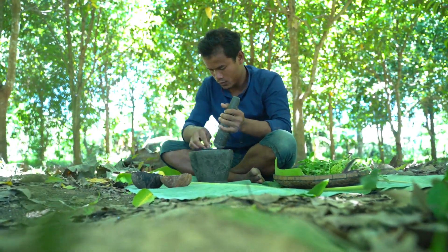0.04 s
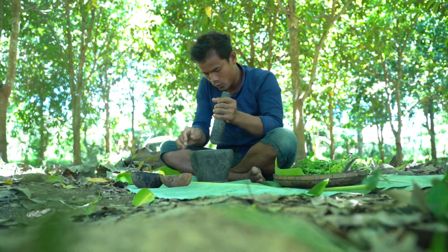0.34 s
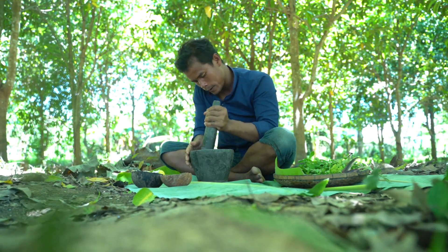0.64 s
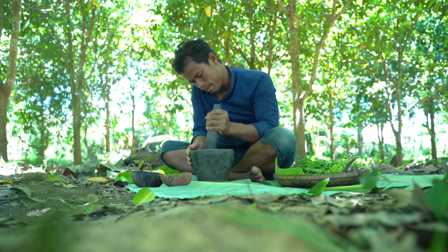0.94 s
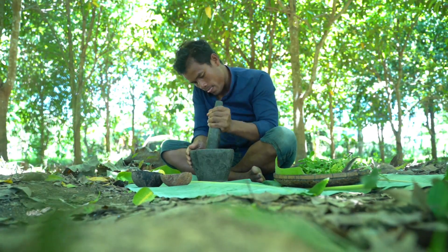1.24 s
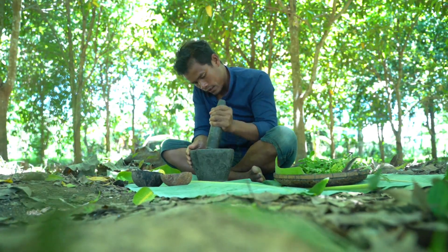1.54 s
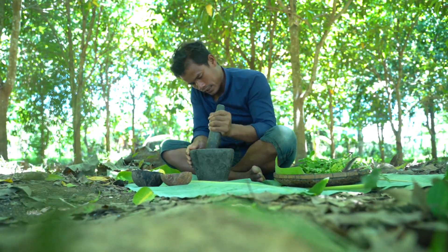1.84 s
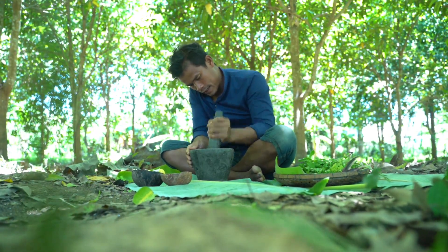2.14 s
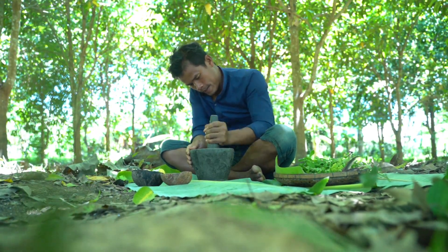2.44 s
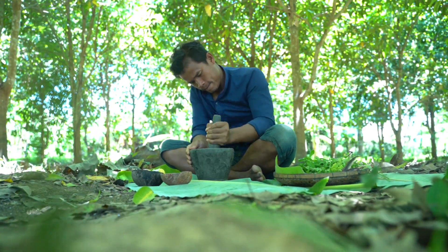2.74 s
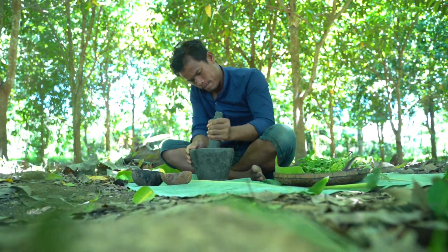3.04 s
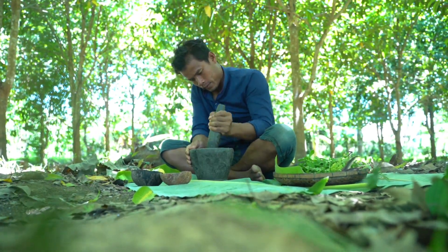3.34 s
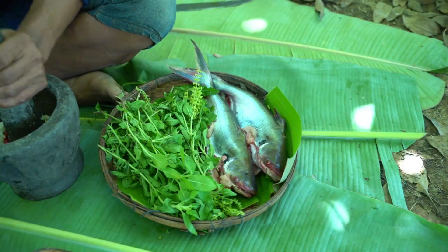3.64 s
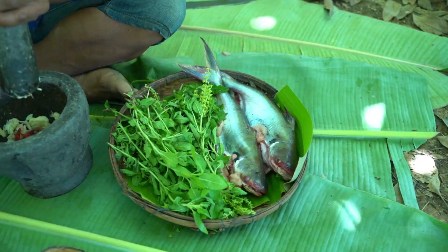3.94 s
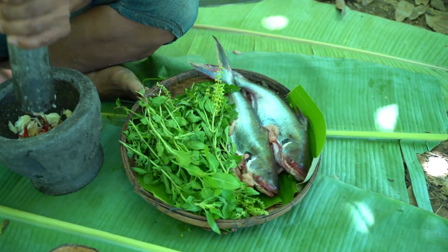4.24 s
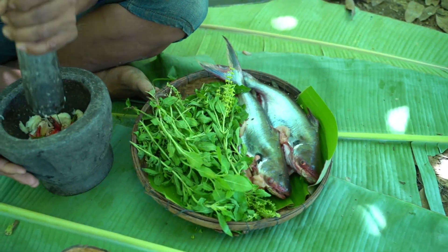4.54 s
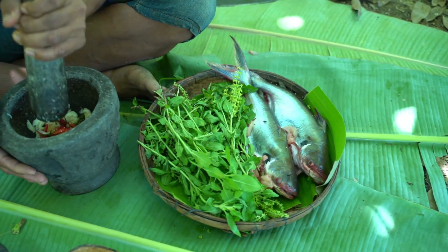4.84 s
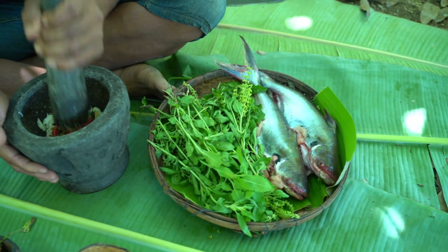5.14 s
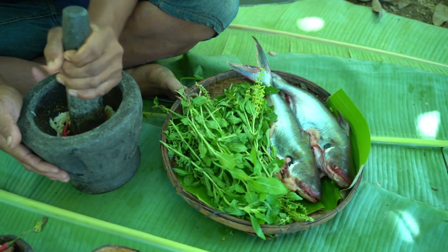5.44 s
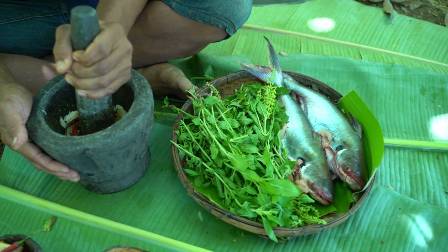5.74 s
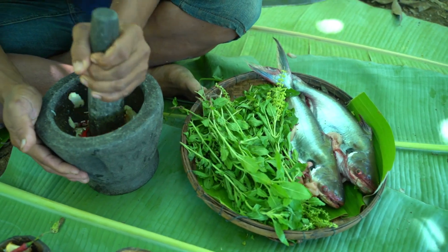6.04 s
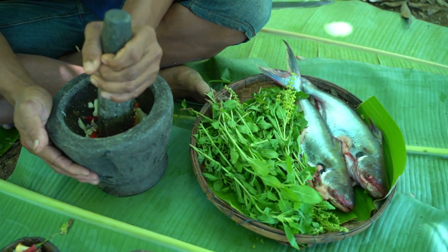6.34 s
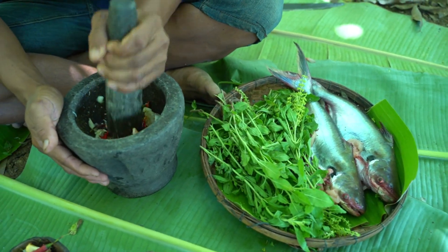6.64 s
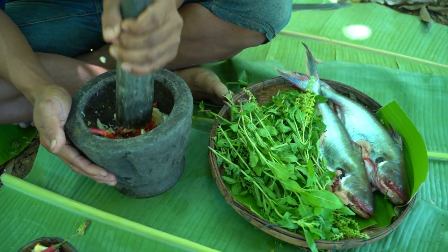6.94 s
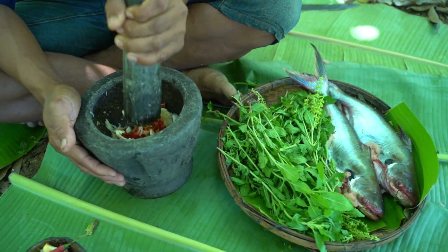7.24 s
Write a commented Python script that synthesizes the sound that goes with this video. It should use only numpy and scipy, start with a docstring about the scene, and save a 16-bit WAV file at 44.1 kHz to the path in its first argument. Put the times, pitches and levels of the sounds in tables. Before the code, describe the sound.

Leaves hiss steadily in a grove over a faint low rumble. For the first half second, herbs rustle and snap as they drop into a stone mortar. From about 0.6 seconds a stone pestle pounds evenly, nearly four strokes a second, heard from a few metres away. Each stroke is a short wet crunch with a quiet knock, a soft thud into the soil and a brief echo from the trees. Louder stone knocks come near 2.8 and 3.3 seconds. At about 3.7 seconds the sound jumps close, slightly left, and the background drops. After a small gap the pounding continues until about 7.1 seconds, juicier, with harder knocks from 5.5 seconds on. A faint, distant rooster and bird whistles come between 3 and 5.3 seconds, with more whistles near 7. A bird gives short high buzzes between 3.2 and 4 seconds and again at 6.2.

```python
"""Herbs rustle and snap as they drop into a stone mortar on the ground of a grove, under hissing leaves.
Then a stone pestle pounds chillies and garlic, heard first from a few metres, later from close by.
Each stroke crushes wet pulp, knocks the bowl quietly and thuds into the soil; some knock louder.
The trees scatter each stroke back, and birds and a rooster call far off."""
import sys
import numpy as np
from scipy import signal
from scipy.fft import rfft, irfft, next_fast_len
from scipy.io import wavfile
from scipy.ndimage import uniform_filter1d, map_coordinates

SR = 44100
rng = np.random.default_rng(int(sys.argv[2]) if len(sys.argv) > 2 else 0)


def dump(signal):
    """Clip the signal to [-1, 1] and save it as 16-bit WAV at the path in sys.argv[1]."""
    limited = np.clip(np.atleast_2d(signal).T, -1, 1)
    pcm = np.round(limited * 32767).astype(np.int16)
    wavfile.write(sys.argv[1], SR, pcm)


N = 321930
TIME = np.arange(N) / SR
HIT_TIME = np.arange(-SR // 20, SR // 5) / SR  # seconds around one hit, which lands at 0

# how loud the background is: t/s, rumble/dB, murmur of the wood/dB, leaf hiss/dB
BACKGROUND_LEVELS = [(0, -51.5, -41.5, -34.5), (.48, -50, -39.5, -34.5), (.66, -56, -44.5, -40),
                     (3.1, -55, -43.5, -37), (3.62, -53.5, -45.5, -41), (3.72, -64, -48.5, -44.5),
                     (5.1, -60.5, -45, -43.5), (7.3, -60, -42, -40)]
# the tone colour of those three sounds: f/Hz, level/dB
RUMBLE_COLOUR = [(15, -56), (25, -38), (97, -1.5), (151, 0.5), (178, 0.5), (270, -2.5), (400, -6.5),
                 (520, 0.5), (880, -120)]
WOOD_COLOUR = [(180, -22), (300, -11), (551, -2), (929, -1.5), (1430, 0.5), (1910, 0), (2800, -6.5),
               (3640, -21), (6160, -120)]
LEAF_COLOUR = [(1290, -21), (2200, -3), (3970, 2.5), (4380, 1.5), (4840, 1), (5350, 0), (9480, -3),
               (13100, -8.5), (16000, -12)]
# how alike left and right are in the background: f/Hz, likeness (1 = the same)
BACKGROUND_LIKENESS = [(40, 0.83), (150, 1), (400, 0.67), (1000, 0.52), (2500, 0.017), (10000, 0.042)]
# bird whistles and rooster notes: t/s, length/s, start f/Hz, end f/Hz, level/dB, overtone/dB
BIRD_NOTES = [(3.149, 0.57, 455, 439, -58.5, -20), (3.567, 0.097, 1136, 1150, -41, -10),
              (4.005, 0.16, 2920, 2690, -49, -30), (4.808, 0.21, 3350, 2750, -52, -30),
              (4.86, 0.27, 1170, 1097, -53.5, 1), (5.166, 0.098, 1390, 1220, -48, -10),
              (7.043, 0.087, 2875, 2500, -45, -24), (7.22, .09, 3850, 3510, -52, -30)]
# a bird's buzzing calls: peak t/s, half length/s, level/dB
BUZZ_CALLS = [(3.198, 0.034, -31.5), (3.697, 0.014, -37), (3.766, 0.029, -37.5), (3.95, 0.038, -37),
              (6.192, 0.052, -27.5)]
# their tone colour: f/Hz, level/dB
BUZZ_COLOUR = [(3300, -64), (4250, -0.5), (4600, 3), (4950, 3), (5300, -12), (6300, -52)]
# what the trees send back: f/Hz, far level/dB, close level/dB
ECHO_COLOUR = [(150, -40, -34), (500, -21, -43), (1160, -16.5, -20), (1850, -13, -24), (2700, -3, -1),
               (4080, -1, 1.5), (7650, 1, 2), (15900, -0.5, -3.5)]
# herbs rustling in the hand: t/s, level/dB
RUSTLE_LEVELS = [(0, -54), (.18, -41), (.3, -29.5), (.42, -39.5), (.53, -48), (.62, -60), (.7, -100)]
# their tone colour: f/Hz, level/dB
RUSTLE_COLOUR = [(100, -16), (300, -14), (1000, -3), (2500, -4), (5000, 4), (10000, 4), (16000, -6)]
# herbs snapping early on; later, ticks (some just before strokes) and a hiss after one stroke:
# t/s, level/dB, f/Hz, width/octaves, fall/s
SHORT_CRACKLES = [(.095, -12.5, 11000, 2.4, 0.0023), (.141, -25, 9000, 1.7, .002),
                  (.1412, -30, 750, 0.3, 0.0031), (.246, -18.5, 6150, .13, 0.0062),
                  (.248, -23, 2920, .3, 0.006), (.308, -21, 5970, 1.4, 0.014),
                  (.319, -20, 7700, 1.9, 0.016), (.523, -21.5, 9300, .22, 0.015),
                  (.523, -29.5, 3020, .18, 0.019), (.534, -27, 2740, 0.81, 0.013),
                  (2.475, -27, 3960, 2.3, 0.019), (3.651, -27.5, 4500, 0.89, .0035),
                  (3.881, -28, 4480, .38, .004), (4.02, -40.5, 1300, 0.89, 0.077),
                  (4.147, -19.5, 3900, 1.5, .006), (4.172, -25.5, 4730, 0.38, 0.052),
                  (4.439, -19, 2600, 1.1, 0.0027), (5.773, -32, 3000, 1.5, .0025),
                  (6.0517, -20, 4000, 1.2, 0.0026), (6.334, -17, 5000, 2.4, .002),
                  (6.935, -30.5, 394, 0.31, 0.0084), (6.935, -28.5, 1380, 1.2, 0.011)]
# how alike left and right are in crackles and crushes: f/Hz, far likeness, close likeness
CRACKLE_LIKENESS = [(700, 1, 0.99), (2980, 0.91, 0.42), (6000, 0.56, 1), (11900, 0.61, 0.059)]
# how much louder the mortar is on the left: f/Hz, far level/dB, close level/dB
LEFT_BOOST = [(200, 0.5, -1), (890, 1.5, 4), (2700, 0.5, 7), (5600, -3.5, 3.5), (12000, -3.5, 1)]
# the soil's low tones: f/Hz, far level/dB, close level/dB, fade/s (time to drop by 60 dB)
SOIL_TONES = [(124, -12, -3, 0.068), (164, 6.5, -7, 0.043), (203, -2.5, -9, 0.065), (404, 4, 3, 0.026)]
# the bowl's hollow and wall: f/Hz, far level/dB, close level/dB, fade/s, share of the hardness (0-1)
BOWL_TONES = [(352, -23, -16, 0.017, 0), (681, 7.5, -24, 0.026, 0.66), (808, -34, 12.5, 0.012, 0.22),
              (903, 5, 1.5, 0.029, 0.35), (975, 8, 3.5, 0.021, 0.72), (1512, 15, 9.5, 0.011, 0.83),
              (1690, -3, 15, 0.0097, 0.77), (3430, -31, -27, 0.1, 0.5), (3740, -43, -32, 0.11, 0.6),
              (4150, -20, -26, 0.085, 0.36)]
# tones the bowl's mouth boosts: f/Hz, sharpness (Q), far boost/dB, close boost/dB
MOUTH_PEAKS = [(1717, 4.2, 3.5, 5), (3620, 10.4, 1, 5.5)]
# tone colour of crushed pulp: f/Hz, far level/dB, close level/dB
PULP_COLOUR = [(100, -35, -12), (540, -18.5, -20), (970, -2.5, -5), (1174, -12, -12), (1510, 1, -6.5),
               (2650, -0.5, -2.5), (3460, -5, -8), (5230, -7.5, -3.5), (6760, -5.5, -5.5), (9700, -6.5, -6),
               (13100, -8, -11.5), (16100, -13.5, -15)]
# pestle strokes: t/s, crush level/dB, rise/s, fall/s, pulp body/dB, air gap f/Hz, thud level/dB
PESTLE_STROKES = [(.575, -9, 0.00042, 0.0083, -3.5, 6060, -46),
                  (.875, -7.5, 0.0018, 0.0064, -5.5, 1740, -42),
                  (1.1531, -6.5, 0.00056, 0.0028, 2, 2600, -38),
                  (1.428, -6.5, 0.0021, 0.0018, 1.5, 3470, -31),
                  (1.7008, -10, 0.0048, 0.0074, -4.5, 1840, -38),
                  (1.981, -8, .0029, .0024, -3.5, 5860, -24.5), (2.2542, -5, 0.0005, 0.0031, -4, 2230, -19),
                  (2.5027, -10, 0.0039, 0.0066, -10.5, 2850, -36),
                  (2.774, -12.5, .0038, 0.008, -8.5, 4930, -28.5),
                  (3.0286, -6.5, 0.0004, 0.0063, -9.5, 3550, -30),
                  (3.286, -10, 0.00043, 0.0026, -6, 2250, -27),
                  (3.5496, -15.5, .0081, 0.0066, -4, 3700, -30.5),
                  (3.7074, -7.5, 0.00046, 0.0019, 0.5, 3500, -33),
                  (4.1563, -7, 0.00075, 0.0018, -5.5, 4300, -46),
                  (4.4454, -6, 0.00047, 0.0021, -1.5, 4100, -27),
                  (4.726, -8, 0.00032, 0.0023, -1.5, 3760, -30),
                  (4.9944, -8.5, 0.00022, 0.0034, -5.5, 3340, -35),
                  (5.2624, -8.5, .00036, 0.0034, -9, 3740, -28.5),
                  (5.5298, -7, 0.0005, 0.0014, -7, 1600, -27),
                  (5.7951, -7, 0.00067, 0.0013, -13, 2660, -23),
                  (6.0645, -10.5, .0046, .0087, -3.5, 4420, -33),
                  (6.3435, -6, .0006, 0.0027, -8, 5170, -23), (6.6057, -9, .0004, 0.0086, -5, 6330, -41),
                  (6.8727, -13.5, 0.00026, 0.0022, -17, 4280, -46),
                  (7.1292, -15.5, 0.00049, 0.0067, -2, 6300, -58)]
# extra knocks where a stroke reaches bare stone: t/s, level/dB, hardness/dB
STONE_KNOCKS = [(1.427, -28, 8), (2.494, -21.5, -5), (2.7694, -8, 10), (3.2859, -5.5, 9),
                (3.5485, -20.5, -9), (3.7087, -16.5, -15), (5.2604, -26, -3), (5.527, -13, -16),
                (5.7955, -6.5, -33), (6.3441, -13, -11), (6.8711, -8.5, -1), (7.1307, -7.5, -11)]

CLOSE_FROM_S = 3.67  # the listener is close by from here on
# Each pair is (far, close); the functions pick one with close = 0 or 1.
LEFT_LEAD_S = (-0.0000021, 0.000035)  # how much sooner the left ear hears the mortar
LEAD_IN_S = (0.0025, 0.0038)  # base length of the faint noise just before each stroke's peak
FIZZ_DB, FIZZ_DB_PER_S = (2, -3), (-1.3, 0.5)  # crisp herbs go limp; later the pulp turns juicy
FIZZ_DB_PER_DOUBLING, USUAL_FALL_S = (0.5, 2), 0.0034  # a longer crush is wetter and fizzes more
QUIET_KNOCK_DB, QUIET_HARDNESS_DB = (-25.5, -30.5), (0.5, 8.5)  # the quiet knock in every stroke
ECHO_DB, ECHO_DB_PER_S = (0, -8.5), (0, -0.33)  # close by, the echo thins as the pounding goes on
DRIFT_ZERO_S = (0.5, 2.8)  # the fizz and echo drifts count from this time


def amp(db):
    """Turn decibels into a number to multiply by."""
    return 10 ** (np.asarray(db) / 20)


def unit(x):
    """Scale a sound to an average (rms) size of 1."""
    return x / np.sqrt(np.mean(x ** 2) + 1e-20)


def along(points, hz, column=0):
    """Read one column of a frequency table, sliding between rows on a pitch scale."""
    f, *values = np.transpose(points)
    return np.interp(np.log(hz + 1), np.log(f), values[column])


def curves(rows):
    """Turn each column of a time table into one value per sample."""
    s, *columns = np.transpose(rows)
    return [np.interp(TIME, s, c) for c in columns]


def wobble(rate, size):
    """A smooth curve through `rate` random points a second."""
    points = rng.standard_normal(int(size * rate / SR) + 4)
    return map_coordinates(points, [np.arange(size) * rate / SR])


def filtered(x, response):
    """Multiply each frequency in x by response(hz)."""
    n = x.shape[-1]
    padded = next_fast_len(n + 4096)
    return irfft(rfft(x, padded) * response(np.fft.rfftfreq(padded, 1 / SR)), padded)[..., :n]


def coloured(x, table, column=0):
    """Give a sound the tone colour in a table."""
    return filtered(x, lambda hz: amp(along(table, hz, column)))


def resonance(hz, centre_hz, q, db):
    """Boost the frequencies near centre_hz; a bigger q makes the peak narrower."""
    return 1 + (amp(db) - 1) / (1 + 1j * q * (hz / centre_hz - centre_hz / (hz + 1)))


def spread(pair, likeness, column=0):
    """Mix two unrelated noises into left and right with the given likeness."""
    turn = lambda hz: np.arccos(np.clip(along(likeness, hz, column), -1, 1)) / 2
    mid, side = filtered(pair, lambda hz: np.array([np.cos(turn(hz)), np.sin(turn(hz))]))
    return np.array([mid + side, mid - side])


def add(track, s, sound):
    """Mix a sound into the track, starting at s seconds."""
    start = round(s * SR)
    part = sound[..., :N - start]
    track[:, start:start + part.shape[-1]] += part


def crackle(size, clump_db):
    """Two streams of tiny noise bursts, some louder, some softer."""
    return unit(rng.standard_normal((2, size)) * amp(clump_db * wobble(3000, size)))


def rush(colour, patchy_db):
    """Outdoor noise with louder and softer patches across pitch and time."""
    grid = signal.stft(rng.standard_normal((2, N)), nperseg=512)[2]
    patches = uniform_filter1d(rng.standard_normal(grid.shape[1:]), size=4, axis=0)
    patches = uniform_filter1d(patches, size=14, axis=1)
    pair = signal.istft(grid * amp(patchy_db * unit(patches)), nperseg=512)[1][:, :N]
    return unit(coloured(spread(pair, BACKGROUND_LIKENESS), colour))


def background(drift_db=0.93, flutter_db=1.36, dip_db=-19, dip_s=0.0092):
    """Low rumble, the far wood and hissing leaves; all dip briefly at 3.67 s."""
    rumble_db, wood_db, leaf_db = curves(BACKGROUND_LEVELS)
    rumble = amp(rumble_db + drift_db * wobble(5, N)) * rush(RUMBLE_COLOUR, patchy_db=-1.0)
    wood = amp(wood_db + drift_db * wobble(2.67, N)) * rush(WOOD_COLOUR, patchy_db=2.5)
    leaves = amp(leaf_db + flutter_db * wobble(3.77, N)) * rush(LEAF_COLOUR, patchy_db=2.5)
    dip = amp(dip_db * np.exp(-((TIME - CLOSE_FROM_S - dip_s) / dip_s) ** 2))
    return dip * (rumble + wood + leaves)


def bird_notes(blur_s=0.23, clear_share=0.81):
    """Gliding whistles and rooster notes, blurred by their many paths through the trees."""
    track = np.zeros((2, N))
    for s, length, start_hz, end_hz, db, overtone_db in BIRD_NOTES:
        progress = np.linspace(0, 1, round(length * SR))
        glide_hz = end_hz + (start_hz - end_hz) * (1 - progress) ** 2
        hz = glide_hz * (1 + 0.0093 * wobble(125, len(progress)))
        phase = 2 * np.pi * np.cumsum(hz) / SR
        swell = np.sqrt(2 * np.abs(np.sin(np.pi * progress))) * amp(db + 3.8 * wobble(53, len(progress)))
        add(track, s, swell * (np.sin(phase) + amp(overtone_db) * np.sin(2 * phase)))
    paths = rng.standard_normal((2, SR // 4)) * amp(-60 * np.arange(SR // 4) / SR / blur_s)
    blurred = signal.fftconvolve(track, paths / np.linalg.norm(paths[0]), axes=1)[:, :N]
    return np.sqrt(clear_share) * track + np.sqrt(1 - clear_share) * blurred


def bird_buzz():
    """A bird buzzes: short, fluttering swells of high, narrow noise."""
    buzz = unit(coloured(rng.standard_normal((2, N)), BUZZ_COLOUR))
    calls = sum(amp(db) / np.cosh(np.minimum(1.53 * np.abs(TIME - s) / half_length, 20))
                for s, half_length, db in BUZZ_CALLS)
    return buzz * calls * amp(1.9 * wobble(107, N))


def tree_echo(sound, close):
    """Trunks and leaves scatter a sound into noise of a like colour, swelling after a short gap."""
    t = np.arange(SR // 2) / SR
    swell = np.clip((t - 0.0064) / 0.0054, 0, 1)
    fade = amp(-60 * t / (0.52 if close else 0.25)) + amp(-28.5 - 60 * t / 0.75)
    answer = (swell * fade) ** 2
    power = np.abs(signal.fftconvolve(np.mean(sound ** 2, axis=0), answer / answer.sum()))
    bins, density = signal.welch(sound, SR, nperseg=96, detrend=False)
    colour = lambda hz: np.sqrt(np.interp(hz, bins, density.mean(axis=0)))
    scatter = unit(filtered(rng.standard_normal((2, len(power))), colour))
    return coloured(scatter * np.sqrt(power), ECHO_COLOUR, close)


def herb_rustle():
    """Leaves rustle in the hand."""
    return amp(curves(RUSTLE_LEVELS)[0]) * unit(coloured(crackle(N, clump_db=5.5), RUSTLE_COLOUR))


def short_crackles(rise_s=0.0005, echo_db=-13.5):
    """Herbs snap early on; later come ticks and a hiss around the strokes. Each has an echo."""
    track = np.zeros((2, N))
    for s, db, pitch_hz, width, fall in SHORT_CRACKLES:
        close = int(s > CLOSE_FROM_S)
        band = lambda hz: 1 / (1 + (np.log2((hz + 1) / pitch_hz) / width) ** 2)
        envelope = np.exp(-np.abs(HIT_TIME) / np.where(HIT_TIME < 0, rise_s, fall))
        bursts = spread(crackle(len(HIT_TIME), clump_db=-0.5), CRACKLE_LIKENESS)
        sound = amp(db) * envelope * unit(filtered(bursts, band))
        add(track, s + HIT_TIME[0], sound)
        add(track, s + HIT_TIME[0], amp(echo_db) * tree_echo(sound, close))
    return track


def placed(pair, close):
    """Place the mortar between the ears; from close by it is louder and earlier on the left."""
    sides = np.array([[0.5], [-0.5]])
    balance = lambda hz: amp(along(LEFT_BOOST, hz, close) * sides)
    time_shift = lambda hz: np.exp(2j * np.pi * hz * LEFT_LEAD_S[close] * sides)
    return filtered(pair, lambda hz: balance(hz) * time_shift(hz))


def small_bowl(x, corner_hz=110):
    """A small bowl gives off little deep bass."""
    return filtered(x, lambda hz: (1j * hz / (corner_hz + 1j * hz)) ** 2)


def thud(close, attack_s=0.005):
    """The mortar's weight is driven into the soil just after the blow."""
    t = np.maximum(HIT_TIME - (0.001 if close else 0.003), 0)
    soil = 0
    for hz, far_db, close_db, fade_s in SOIL_TONES:
        db = close_db if close else far_db
        pitch_hz = hz * (1 + 0.074 * rng.standard_normal())
        soil = soil + amp(db - 60 * t / fade_s) * np.sin(2 * np.pi * pitch_hz * t)
    return soil * (1 - np.exp(-t / attack_s))


def knock(delay_s, hardness_db, close, attack_s=0.0021):
    """Stone meets stone: the bowl rings briefly, and the hardness sets how bright it sounds."""
    t = np.maximum(HIT_TIME - delay_s, 0)
    ring = 0
    for hz, far_db, close_db, fade_s, share in BOWL_TONES:
        db = (close_db if close else far_db) + share * hardness_db + rng.normal(0, 1)
        pitch_hz = hz * (1 + 0.02 * rng.standard_normal())
        ring = ring + amp(db - 60 * t / fade_s) * np.sin(2 * np.pi * pitch_hz * t)
    ring = ring * (1 - np.exp(-t / attack_s))
    strength = np.sqrt(np.sum(ring ** 2) / (0.002 * SR))
    return placed(np.array([ring, ring]) / strength, close)


def crush(rise, fall, body_db, fizz_db, gap_hz, close, ripple_db=1.5):
    """Plant cells burst under the pestle: after a faint lead-in, a peak and a quick dying away."""
    t = HIT_TIME
    landing = np.exp(-np.abs(t) / np.where(t < 0, rise, fall))
    lead_s = LEAD_IN_S[close] + 1.7 * rise  # longer before a soft landing
    lead_in = 0.21 * (t < 0) / (1 + np.abs(t / lead_s) ** 6)
    envelope = np.hypot(landing, lead_in)
    ripple = np.transpose([np.geomspace(600, 16000, num=44), ripple_db * rng.standard_normal(44)])
    stroke = [(700, body_db / 2), (1800, body_db), (3200, 0), (5500, 0), (9000, fizz_db)]
    pulp = lambda hz: amp(along(PULP_COLOUR, hz, close) + along(stroke, hz) + along(ripple, hz))
    # the air gap between pestle and bowl rings at a new pitch with every stroke
    gap = lambda hz: resonance(hz, gap_hz, q=9, db=6)
    mouth = lambda hz: np.prod([resonance(hz, f, q, db[close]) for f, q, *db in MOUTH_PEAKS], axis=0)
    bursts = spread(crackle(len(t), clump_db=3.0), CRACKLE_LIKENESS, close)
    crunch = filtered(bursts * envelope, lambda hz: pulp(hz) * gap(hz) * mouth(hz))
    return unit(placed(crunch, close)) * np.sqrt(np.mean(envelope ** 2))


def pounding(knock_lead_s=0.004005):
    """Each stroke crushes, knocks quietly and thuds; some knock louder; the trees answer."""
    track = np.zeros((2, N))
    for s, db, rise, fall, body_db, gap_hz, thud_db in PESTLE_STROKES:
        close = int(s > CLOSE_FROM_S)
        elapsed = s - DRIFT_ZERO_S[close]
        wetness_db = FIZZ_DB_PER_DOUBLING[close] * np.log2(fall / USUAL_FALL_S)
        fizz_db = FIZZ_DB[close] + FIZZ_DB_PER_S[close] * elapsed + wetness_db
        pulp = amp(db) * crush(rise, fall, body_db, fizz_db, gap_hz, close)
        quiet_knock = amp(QUIET_KNOCK_DB[close]) * knock(-knock_lead_s, QUIET_HARDNESS_DB[close], close)
        add(track, s + HIT_TIME[0], pulp + quiet_knock + amp(thud_db) * thud(close))
        echo_db = ECHO_DB[close] + ECHO_DB_PER_S[close] * elapsed
        add(track, s + HIT_TIME[0], amp(echo_db) * tree_echo(pulp + quiet_knock, close))
    for s, db, hardness_db in STONE_KNOCKS:
        close = int(s > CLOSE_FROM_S)
        stone = amp(db) * knock(0, hardness_db, close)
        add(track, s + HIT_TIME[0], stone)
        add(track, s + HIT_TIME[0], amp(ECHO_DB[close]) * tree_echo(stone, close))
    return track


def scene():
    """Everything heard in the grove."""
    mortar = small_bowl(pounding()) + herb_rustle() + short_crackles()
    return mortar + bird_notes() + bird_buzz() + background()


def gain_control(x, treble_hz=2500, above_db=-22.5, share=0.5, attack_s=0.047, recover_db_per_s=24):
    """From close by, each sharp crack turns the volume down; then it creeps back up."""
    treble = filtered(x, lambda hz: hz / np.hypot(hz, treble_hz))
    power = uniform_filter1d(np.mean(treble ** 2, axis=0), size=128)
    level_db = 10 * np.log10(np.abs(power) + 1e-12)
    wanted_db = share * np.maximum(level_db - above_db, 0) * (TIME > CLOSE_FROM_S)
    recovery_db = recover_db_per_s * TIME
    down_db = np.maximum.accumulate(wanted_db + recovery_db) - recovery_db
    smoothing = np.exp(-1 / (attack_s * SR))
    return x * amp(-signal.lfilter([1 - smoothing], [1, -smoothing], down_db))


def record(dry, top_hz=15950):
    """The volume dips after close cracks, the tallest peaks round off, and the highest treble is cut."""
    ducked = gain_control(dry)
    rounded = ducked / (1 + np.abs(ducked) ** 6) ** (1 / 6)
    return filtered(rounded, lambda hz: hz < top_hz)


dry = scene()
out = record(dry)
dump(out)
```